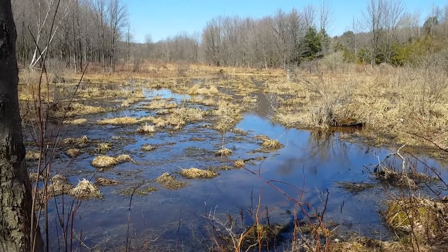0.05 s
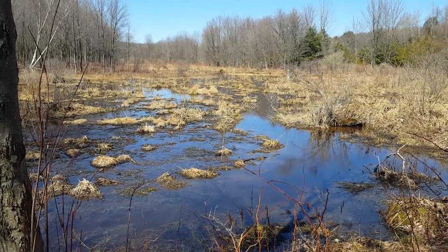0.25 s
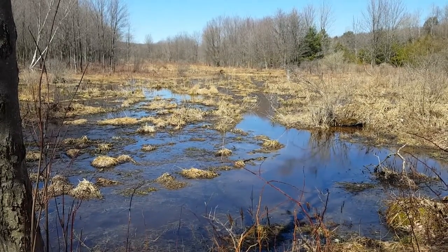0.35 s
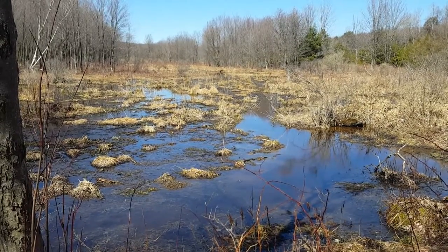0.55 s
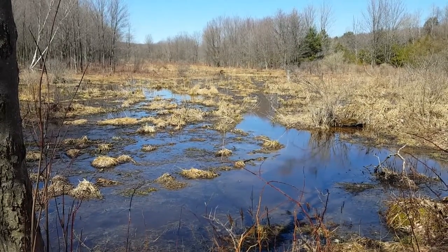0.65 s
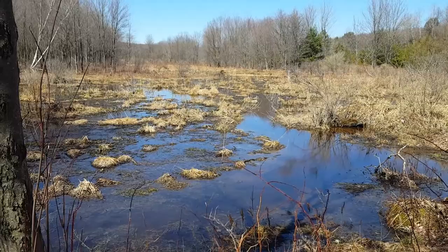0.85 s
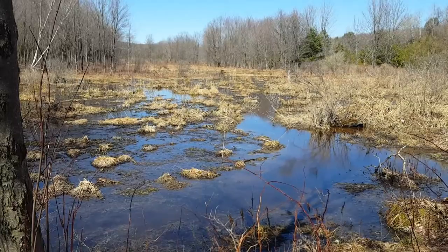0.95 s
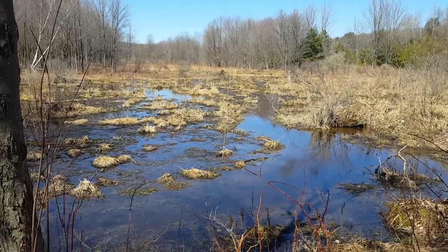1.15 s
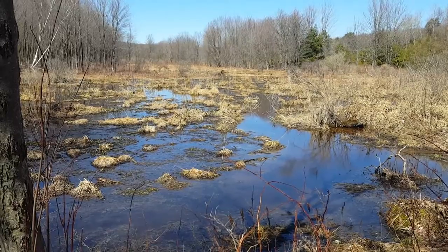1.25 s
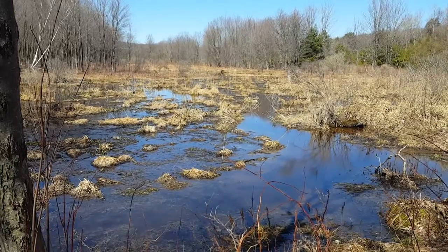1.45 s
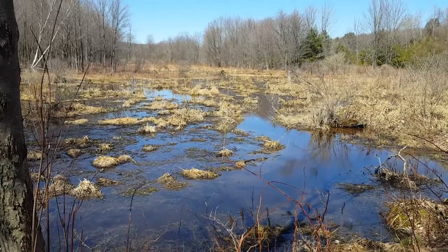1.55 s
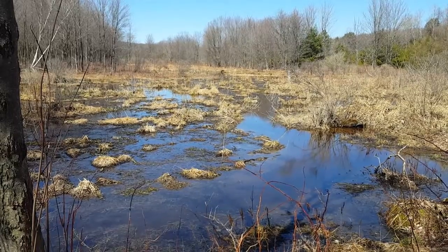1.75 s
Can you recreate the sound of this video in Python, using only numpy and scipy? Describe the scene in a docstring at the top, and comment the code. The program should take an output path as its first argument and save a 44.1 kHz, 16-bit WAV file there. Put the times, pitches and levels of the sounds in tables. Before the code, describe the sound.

Small frogs call across an open marsh, their high rising peeps and pulsed trills overlapping above a distant chorus. Soft air noise lies underneath, and one sharp click sounds close to the microphone early on.

```python
"""Rising peeps and pulsed trills of spring peepers cross an open marsh, over a distant chorus.
Each voice is a near-pure whistle with faint overtones, scattered by reeds and the tree line.
Still air rumbles and hisses softly, with a low bump, a faint rustle and a small animal's blips.
One sharp click sounds right beside the microphone."""
import sys
import numpy as np
from scipy import signal
from scipy.fft import rfft, irfft
from scipy.io import wavfile
from scipy.ndimage import uniform_filter1d

SR = 44100
rng = np.random.default_rng(int(sys.argv[2]) if len(sys.argv) > 2 else 0)


def unload_wav(signal):
    """Save mono or channel-first audio to the path in sys.argv[1] as 16-bit WAV at rate SR, clipped to [-1, 1]."""
    wavfile.write(
        sys.argv[1],
        SR,
        np.round(np.clip(np.atleast_2d(signal).T, -1, 1) * 32767).astype(np.int16),
    )


N = 79380


def amp(db):
    """Decibels to gain."""
    return 10 ** (np.asarray(db) / 20)


def unit(x):
    """Scales to rms 1."""
    return x / np.sqrt(np.mean(abs(x) ** 2) + 1e-20)


def pan(db):
    """Constant-power stereo gains; db is left minus right."""
    return unit(amp([[db / 2], [-db / 2]]))


def fade(t, length_s, rise_s, fall_s):
    """Smooth attack, hold and release."""
    return np.sin(np.pi / 2 * np.clip(np.minimum(t / rise_s, (length_s - t) / fall_s), 0, 1)) ** 2


def spectrum_db(table, hz, column=1):
    """Interpolates a spectrum table over log frequency."""
    columns = np.transpose(table)
    return np.interp(np.log(hz + 1), np.log(columns[0] + 1), columns[column])


def add(mix, start_s, sound):
    """Mixes in a stereo sound, cropped to fit."""
    at = round(start_s * SR)
    sound = sound[:, max(-at, 0):]
    part = mix[:, max(at, 0):][:, :sound.shape[1]]
    part += sound[:, :part.shape[1]]


def tone_burst(length_s, hz):
    """A Hann-windowed sine."""
    t = np.arange(0, length_s, 1 / SR)
    return np.sin(np.pi * t / length_s) ** 2 * np.sin(2 * np.pi * hz * t)


def scatter(x, t60_s, echoes_per_s=2000):
    """A dying cloud of sparse echoes, different for each ear."""
    t = np.arange(SR) / SR
    taps = rng.standard_normal((2, SR)) * (rng.random((2, SR)) < echoes_per_s / SR)
    taps *= (t > .003) * amp(-60 * t / t60_s)
    taps /= np.linalg.norm(taps, axis=1, keepdims=True)
    return signal.fftconvolve(x, taps, axes=1)[:, :N]


# Each row: frequency in Hz, relative noise density in dB.
AIR_SPECTRUM = [(20, -8.5), (60, 7), (100, 5.5), (200, 0.5), (400, -3.5), (800, -9), (2000, -10.5),
                (3500, -10), (5000, -20), (7000, -19.5), (10000, -25), (14500, -19.5), (15600, -23.5),
                (16200, -45)]

def air(level_db=-66, correlation=0.15):
    """Soft rumble and hiss with slowly drifting patches."""
    frames, hz = N // 512 + 5, np.fft.rfftfreq(2048, 1 / SR)
    re, im, other_re, other_im, patches = rng.standard_normal((frames, len(hz), 5)).T
    patches_db = unit(uniform_filter1d(uniform_filter1d(patches, size=14, axis=0), size=8, axis=1))
    left = re + 1j * im
    right = correlation * left + np.sqrt(1 - correlation ** 2) * (other_re + 1j * other_im)
    spectra = np.array([left, right]) * amp(spectrum_db(AIR_SPECTRUM, hz)[:, None] + patches_db)
    noise = signal.istft(spectra, nperseg=2048, noverlap=1536)[1][:, :N]
    return amp(level_db) * pan(-1.5) * unit(noise)


def bump(start_s=.198, level_db=-62):
    """One soft low bump."""
    out = np.zeros((2, N))
    add(out, start_s, pan(0) * amp(level_db) * tone_burst(length_s=.052, hz=65))
    return out


# Each row: frequency in Hz, relative gain in dB.
RUSTLE_SPECTRUM = [(200, -30), (1700, -20), (2400, 0), (3000, -2), (4600, -10), (6000, -23), (9000, -36),
                   (15000, -45)]

def rustle(start_s=.85, length_s=.095, level_db=-63, grains_per_s=1700):
    """A faint, brief clump of tiny crackles."""
    out, t = np.zeros((2, N)), np.arange(0, length_s, 1 / SR)
    grains = rng.standard_normal((2, len(t))) * (rng.random((2, len(t))) < grains_per_s / SR)
    envelope = fade(t, length_s, length_s / 10, length_s / 2)
    add(out, start_s, amp(level_db) * pan(-7) * unit(grains) * envelope)
    colour = unit(amp(spectrum_db(RUSTLE_SPECTRUM, np.fft.rfftfreq(N, 1 / SR))))
    return irfft(rfft(out) * colour, N)


# Each row: centre in seconds, pitch in Hz, level in dB.
BLIPS = [(.182, 1960, -55.5), (1.162, 2007, -51), (1.589, 2000, -59.5)]

def blips(length_s=.0081):
    """Soft low blips from some small animal."""
    out = np.zeros((2, N))
    for centre_s, hz, db in BLIPS:
        add(out, centre_s - length_s / 2, pan(-9.5) * amp(db) * tone_burst(length_s, hz))
    return out


def chorus(calls_per_s=20, level_db=-63.5, low_hz=2459, high_hz=2938, glide_hz=277):
    """Many distant frogs trilling at random, echoing over the marsh."""
    out = np.zeros((2, N))
    for slot_s in np.arange(-.3, N / SR, 1 / calls_per_s):
        when, pitch, size, pace, side = rng.random(5)
        hz = low_hz + (high_hz - low_hz) * pitch
        call = far_trill(length_s=.11 + .27 * size, first_hz=hz, last_hz=hz + glide_hz,
                         spacing_s=.014 + .006 * pace, db=0, pan_db=10 * (side - .5))
        add(out, slot_s + when / calls_per_s, call)
    return amp(level_db) * pan(-3.5) * unit(out + scatter(out, t60_s=1))


def far_trill(length_s, first_hz, last_hz, spacing_s, db, pan_db):
    """A fully pulsed, linear glide, loudest in the middle."""
    curve = [(0, first_hz, db - 4, 1),
             (length_s / 2, (first_hz + last_hz) / 2, db, 1),
             (length_s, last_hz, db - 4, 1)]
    return trill(curve, spacing_s, pan_db, lead_rad=rng.uniform(.62, 2.83), timbre="soft")


# Each row: start and length in seconds, first and last pitch in Hz, pulse spacing in seconds,
# level and pan in dB.
FAR_TRILLS = [(0.018, .31, 2584, 2921, 0.024, -57.5, -3.5), (0.171, 0.058, 3180, 3160, 0.012, -55.5, -5.5),
              (0.288, 0.047, 3072, 3246, 0.013, -56, -5), (.335, .14, 2880, 2900, .022, -60, -3),
              (.414, .19, 2350, 2560, .0217, -56.5, -5), (0.487, .17, 3040, 3400, .0225, -58, 0.5),
              (0.601, 0.045, 2560, 2660, .0215, -51, -1), (0.79, 0.17, 2700, 2920, 0.022, -50, -2.5),
              (0.887, 0.158, 2918, 3118, 0.0231, -51, -12), (1.143, 0.14, 2779, 2960, 0.021, -43, -4.5),
              (1.553, 0.091, 2874, 2776, 0.0195, -53.5, -5.5), (1.651, 0.15, 2660, 2898, 0.019, -49, -5.5),
              (1.69, 0.1007, 2850, 3090, 0.0135, -51, -1.5)]

def far_frogs(echo_db=-9):
    """Trills from farther out, smeared by the reeds on their way."""
    out = np.zeros((2, N))
    for start_s, *call in FAR_TRILLS:
        add(out, start_s, far_trill(*call))
    return out + amp(echo_db) * scatter(out, t60_s=.2)


# Each row: frequency in Hz, relative left and right gain in dB.
CLICK_SPECTRUM = [(40, -30, -20), (137, 4, 1.5), (437, 3, -4), (760, -1.5, -24.5), (1296, 2.5, 3),
                  (1640, 9, -9.5), (2496, 13, 1.5), (3000, -7.5, 7.5), (3800, 9.5, -11.5), (5200, 1.5, 0),
                  (6740, -19.5, 19), (8130, -2.5, 6), (9900, 6, -15), (11670, -6, -1.5), (15560, 10, -2),
                  (16250, -6, -21)]
# Each row: frequency in Hz, level in dB, T60 in seconds.
WOODY_MODES = [(980, -59, .065), (1220, -65, .045)]

def click(start_s=.4857, gain_db=-3, right_lag_s=.00023, smear_s=.0015, damped_hz=3500, size=4096):
    """One dry snap that reaches the left ear first, followed by a brief woody ring."""
    hz, out = np.fft.rfftfreq(size, 1 / SR), np.zeros((2, N))
    gain = amp([spectrum_db(CLICK_SPECTRUM, hz, column) for column in (1, 2)])
    log_gain = uniform_filter1d(np.log(gain), size=3)
    treble = np.clip(hz / damped_hz - 1, 0, 1)
    log_gain += treble * (uniform_filter1d(log_gain, size=45) - log_gain)  # broader peaks ring less
    mirrored = np.hstack([log_gain, log_gain[:, -2:0:-1]])
    minimum_phase = -signal.hilbert(mirrored).imag[:, :len(hz)]
    delay_s = np.array([[0], [right_lag_s]]) + smear_s * hz / SR
    phase = minimum_phase - 2 * np.pi * hz * delay_s
    snap = np.fft.fftshift(irfft(np.exp(log_gain + 1j * phase)), axes=1)
    add(out, start_s - size / 2 / SR, amp(gain_db) * snap * np.hanning(size))
    t = np.arange(size) / SR
    ring = sum(amp(db - 60 * t / t60_s) * np.sin(2 * np.pi * mode_hz * t)
               for mode_hz, db, t60_s in WOODY_MODES)
    add(out, start_s, pan(8) * ring)
    return out


# By timbre. Each row: harmonic number (the whistle is 2), relative level in dB, envelope exponent.
PARTIALS = {"bright": [(1, -33, .6), (3, -20, 2.4), (4, -39, 0.6), (5, -28, 0.06)], "pure": [(1, -36, 0.87),
            (3, -35, 0.93), (4, -44, 0.91)], "soft": [(1, -37, .8), (3, -35, .7), (4, -43, .9),
            (5, -41, .8)], "reedy": [(1, -36, 0.9), (3, -34, 0.9), (4, -38, 0.9), (5, -39, 1.3)],
            "raspy": [(3, -9, 1), (4, -13, 1)]}
# By timbre: phase jitter of the partials in radians; also scales their flicker.
ROUGHNESS_RAD = {"bright": .3, "pure": .6, "soft": 1.3, "reedy": 1.25, "raspy": .8}

def voice(hz, envelope, pan_db, lead_rad, timbre, jitter_step_s=.0025, flicker_step_s=.018):
    """A frog's whistle, leading in phase at the left ear, with rough, flickering partials."""
    phase = 2 * np.pi * np.cumsum(hz) / SR + rng.uniform(0, 2 * np.pi)
    whistle = pan(pan_db) * envelope * np.sin(phase + np.array([[lead_rad], [0]]))
    t, peak, partials = np.arange(len(hz)) / SR, envelope.max(), 0
    for harmonic, db, exponent in PARTIALS[timbre]:
        jitter, drift = ROUGHNESS_RAD[timbre] * rng.standard_normal((2, 512))
        jitter_rad = np.interp(t, np.arange(512) * jitter_step_s, jitter)
        flicker_db = 2.5 * np.interp(t, np.arange(512) * flicker_step_s, drift)
        level = amp(db + flicker_db) * peak * (envelope / peak) ** exponent
        partials += level * np.sin(harmonic * phase / 2 + jitter_rad)
    return np.sqrt(2) * (whistle + pan(-8) * partials * fade(t, t[-1], rise_s=.0057, fall_s=.013))


def trill(curve, spacing_s, pan_db, lead_rad, timbre, sag_hz=39.5):
    """A gliding whistle chopped into pulses, each sagging a little in pitch."""
    times_s, hz, db, depths = np.transpose(curve)
    t = np.arange(times_s[0], times_s[-1], 1 / SR)
    elapsed_s = t - times_s[0]
    cycle = elapsed_s / spacing_s % 1
    depth = np.interp(t, times_s, depths)
    pulses = 1 - depth + depth * np.sin(np.pi * cycle) ** 3.4
    edges = fade(elapsed_s, times_s[-1] - times_s[0], rise_s=.005, fall_s=.004)
    envelope = amp(np.interp(t, times_s, db)) * pulses * edges
    pitch_hz = np.interp(t, times_s, hz) - sag_hz * (cycle - .5)
    return voice(pitch_hz, envelope, pan_db, lead_rad, timbre)


def peep(length_s, first_hz, last_hz, bend, db, swell_db, pan_db, lead_rad, timbre):
    """One slurred whistle that moves by swell_db toward db and stops quickly."""
    t = np.arange(0, length_s, 1 / SR)
    progress = t / length_s
    envelope = amp(db - swell_db * (1 - progress) ** 2) * fade(t, length_s, rise_s=.015, fall_s=.016)
    pitch_hz = first_hz + (last_hz - first_hz) * progress ** bend
    return voice(pitch_hz, envelope, pan_db, lead_rad, timbre)


# Each row: start and length in seconds, first and last pitch in Hz, glide exponent,
# level, swell and pan in dB, left lead in radians, timbre.
PEEPS = [(0.055, .130, 2628, 2924, 1.46, -47.5, 15.5, 1.5, 2.3, "bright"),
         (0.225, 0.058, 3055, 3316, 1.08, -40.5, 3.5, -11.5, 0.29, "pure"),
         (0.364, .056, 3420, 3750, 1, -70, 1, 5, 1, "pure"),
         (1.029, 0.14, 2665, 3011, 1.9, -46.5, 8.5, 0, 2.45, "bright"),
         (1.044, 0.12, 2492, 2803, 1.32, -48.5, 7, 3.5, 2.4, "pure"),
         (1.203, 0.059, 3042, 3299, 0.89, -40, -2, -11.5, 1.15, "pure")]
# Each row: start in seconds, pitch in Hz, level in dB.
SQUEAKS = [(0.856, 2320, -57.5), (.907, 2513, -53), (1.55, 2506, -53)]
# Two trill curves. Each row: time in seconds, pitch in Hz, level in dB, pulse depth from 0 to 1.
FIRST_TRILL = [(.652, 2690, -50, 1), (.70, 2736, -48, 1), (.77, 2843, -39.5, 0.87),
               (.808, 2935, -36.5, 0.58), (.84, 3043, -41, 0.3), (.875, 3125, -42, 1),
               (.919, 3164, -50.5, 0.85)]
SECOND_TRILL = [(1.177, 2390, -47.5, 0.8), (1.224, 2510, -42, 0.95), (1.304, 2539, -40.5, 0.88),
                (1.365, 2679, -46.5, .95), (1.425, 2836, -41, 0.99), (1.47, 2917, -39.5, 0.95),
                (1.52, 2933, -42, 1), (1.548, 3000, -48.5, 0.9)]
# Each row: curve, pulse spacing in seconds, pan in dB, left lead in radians, timbre.
NEAR_TRILLS = [(FIRST_TRILL, .01790, -0.81, 0.34, "soft"), (SECOND_TRILL, .0195, -13, 0.96, "reedy")]

def near_frogs():
    """The callers that stand out: rising peeps, short raspy squeaks and two trills."""
    out = np.zeros((2, N))
    for start_s, *call in PEEPS:
        add(out, start_s, peep(*call))
    for start_s, hz, db in SQUEAKS:
        squeak = peep(length_s=.021, first_hz=hz, last_hz=hz, bend=1, db=db, swell_db=0,
                      pan_db=-6, lead_rad=.92, timbre="raspy")
        add(out, start_s, squeak)
    for curve, *call in NEAR_TRILLS:
        add(out, curve[0][0], trill(curve, *call))
    return out


def scene(reeds_db=-11.5, marsh_db=-12):
    """Calls with their echoes from reeds and trees, over the background, plus the close click."""
    background = air() + bump()
    calls = blips() + near_frogs() + far_frogs()
    reed_echoes = amp(reeds_db) * scatter(calls, t60_s=.13)
    marsh_echoes = amp(marsh_db) * scatter(calls, t60_s=1)
    return background + chorus() + rustle() + click() + calls + reed_echoes + marsh_echoes


def record(dry, cutoff_hz=16050):
    """The recorder's band limit."""
    lowpass = signal.firwin(511, cutoff_hz, window=("kaiser", 9), fs=SR)
    return signal.oaconvolve(dry, lowpass[None], "same")


dry = scene()
out = record(dry)
unload_wav(out)
```